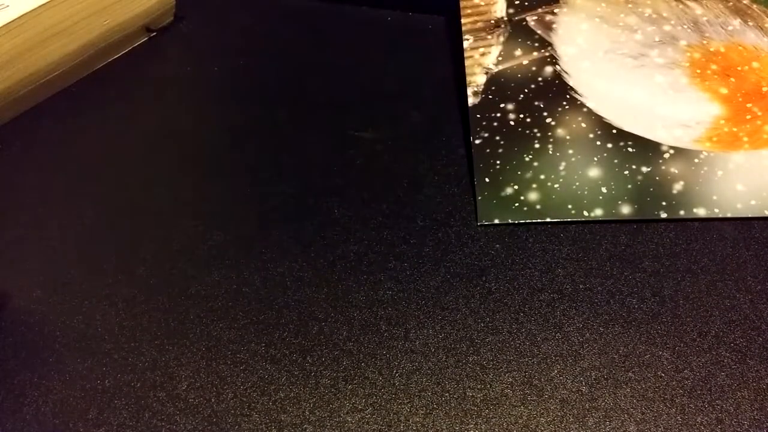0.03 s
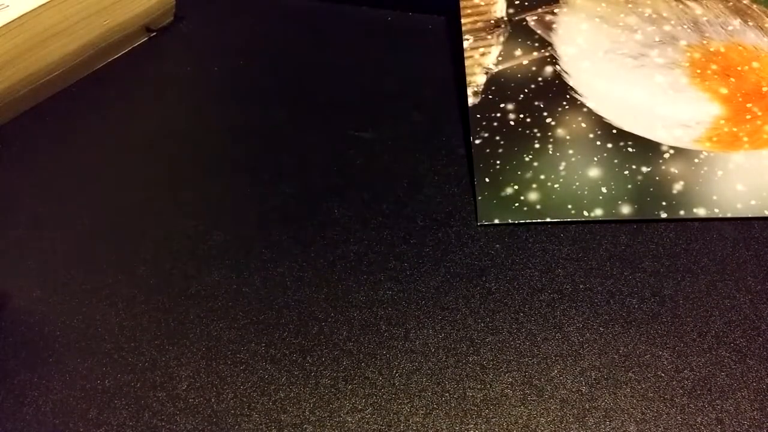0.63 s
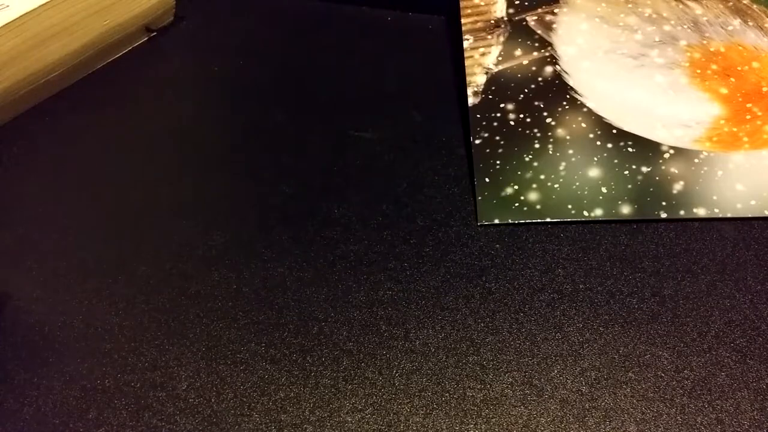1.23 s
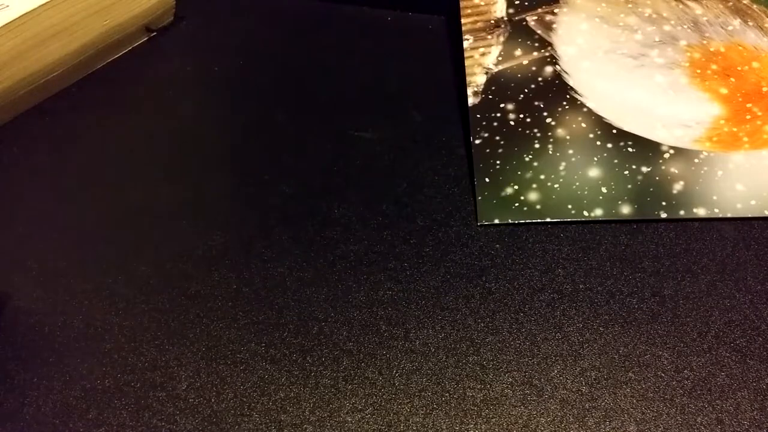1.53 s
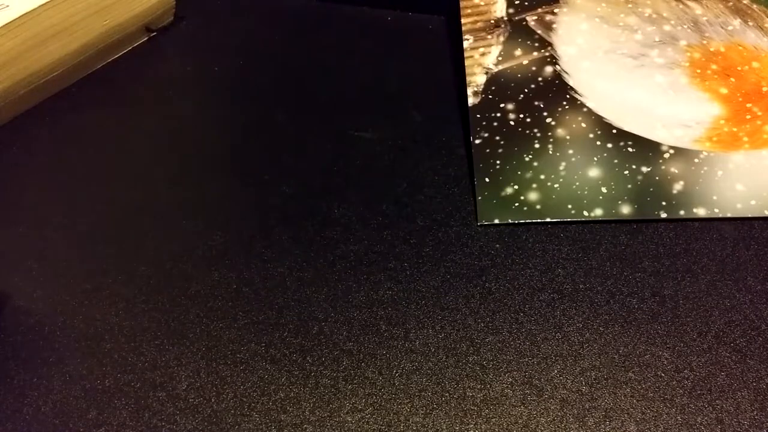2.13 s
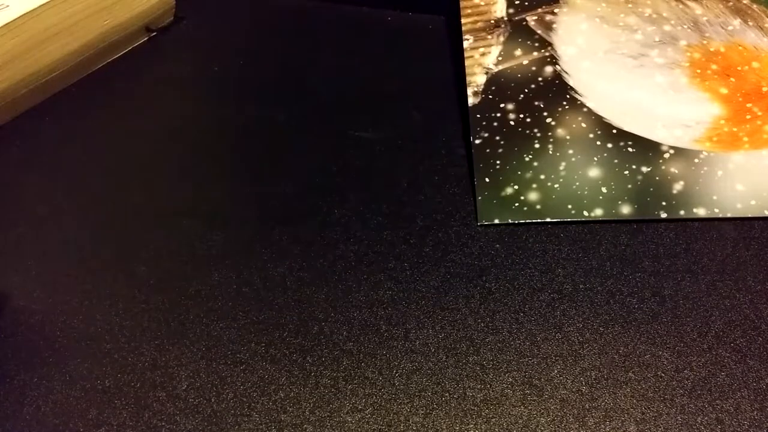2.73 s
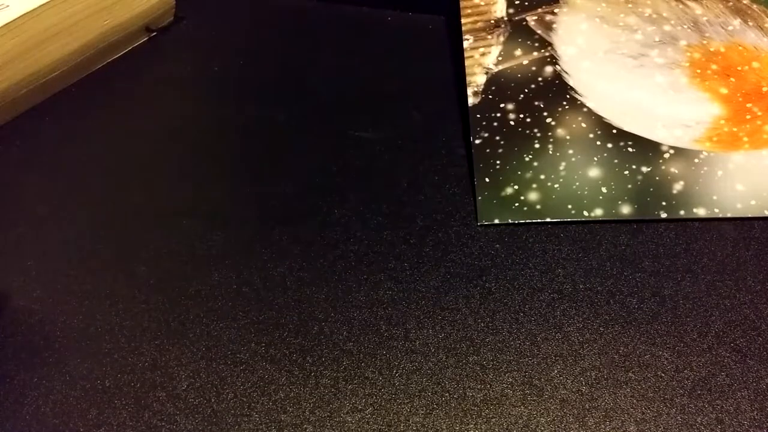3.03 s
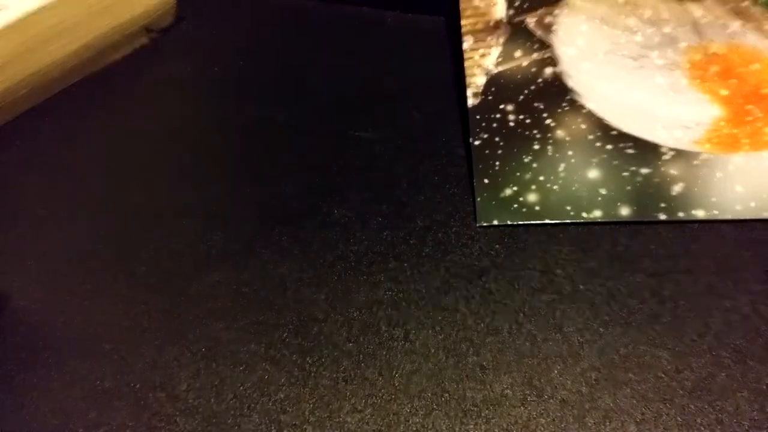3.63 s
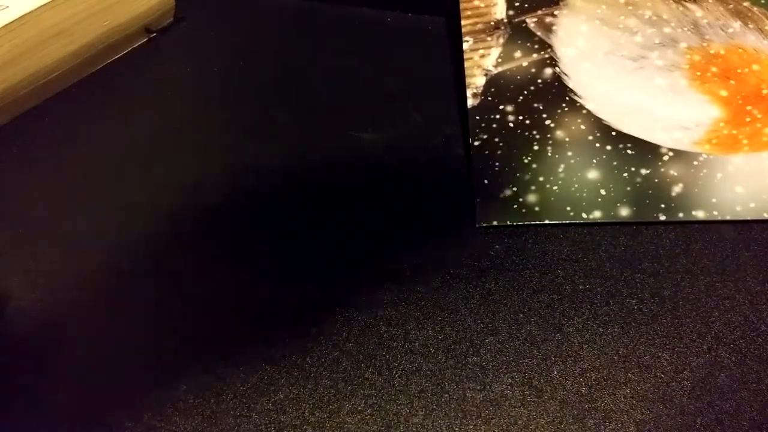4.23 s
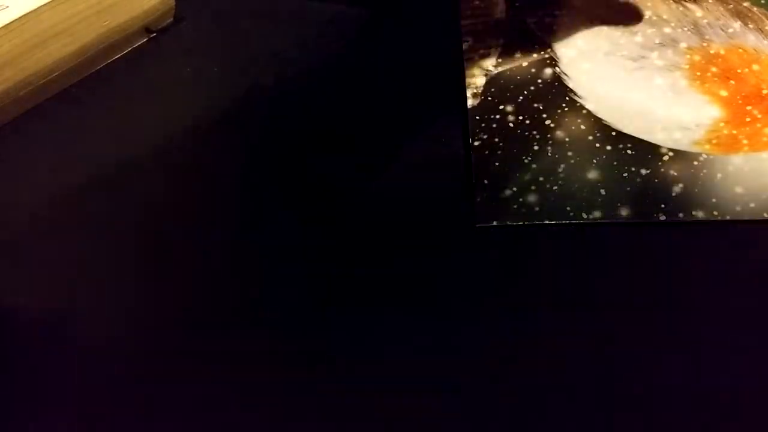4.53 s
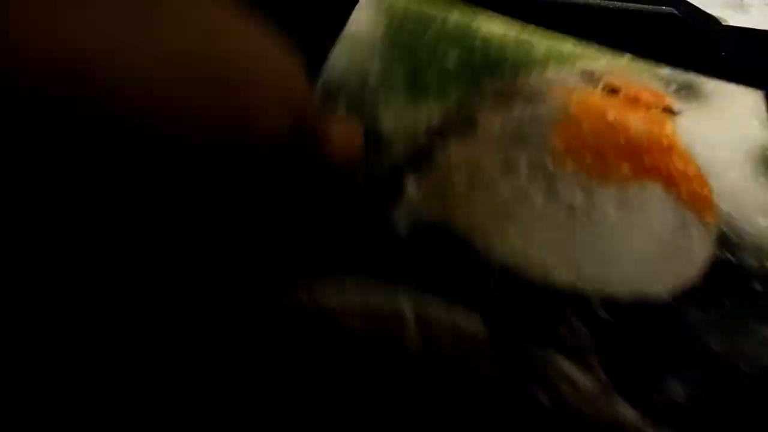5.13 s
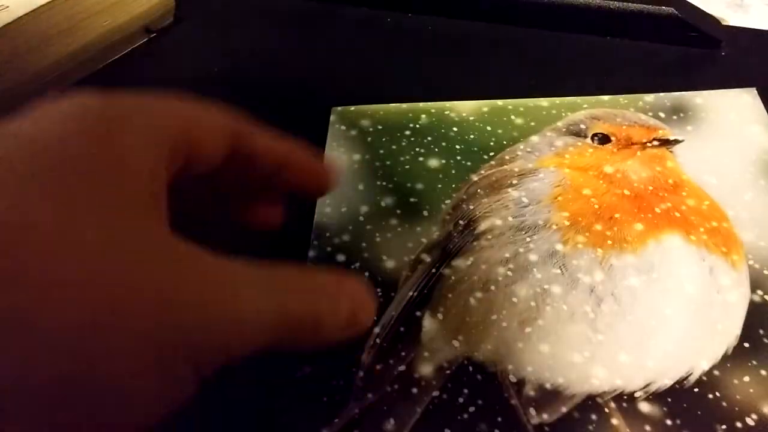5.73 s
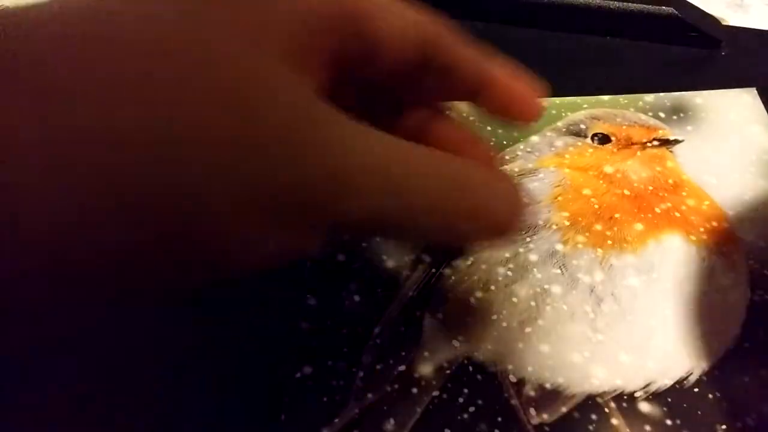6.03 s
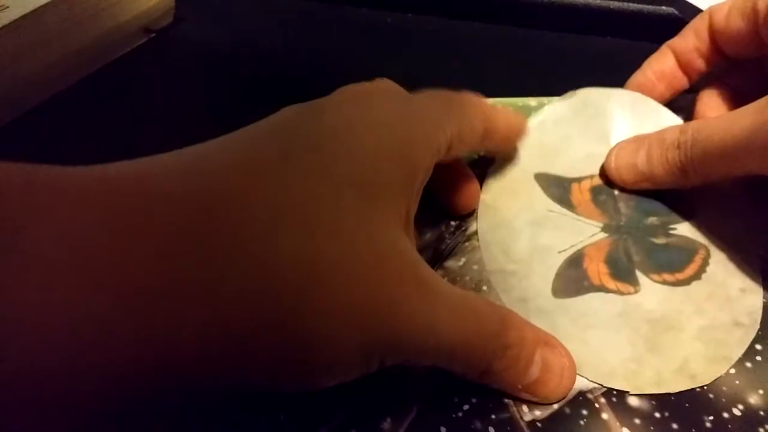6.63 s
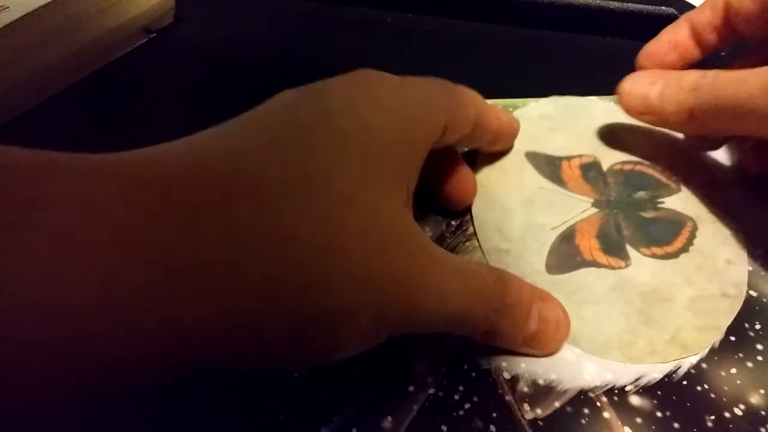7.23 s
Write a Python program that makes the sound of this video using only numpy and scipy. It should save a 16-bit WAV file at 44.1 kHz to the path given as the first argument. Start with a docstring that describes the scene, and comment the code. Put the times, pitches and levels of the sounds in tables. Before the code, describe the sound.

Light crinkling and swishing of adhesive film and card, interrupted by a hollow object set down, dragged and left rocking.

```python
"""Adhesive film at a craft table

A sheet of self-adhesive plastic film is handled close up in a small room. The backing slides in tiny
slips, creases buckle and snap, and stick-slip draws short squeaks. Something hollow is set down, dragged
and left rocking, its body ringing with the table top. Then a card is pulled over and the film is laid
on it. A mains hum and a soft hiss lie underneath."""
import sys
import numpy as np
from scipy import signal
from scipy.fft import rfft, irfft, next_fast_len
from scipy.io import wavfile
from scipy.ndimage import uniform_filter1d

SR = 44100
rng = np.random.default_rng(int(sys.argv[2]) if len(sys.argv) > 2 else 0)


def store_wav(level_fs):
    """Save 16-bit WAV to argv[1]."""
    pcm = np.round(np.clip(np.atleast_2d(level_fs), -1, 1) * 32767)
    wavfile.write(sys.argv[1], SR, pcm.T.astype(np.int16))


N = 320518
TIME = np.arange(N) / SR
STEPS = np.arange(0, N / SR + .001, .001)  # millisecond grid for hand movements, t/s

# a hand slides film or card along: start/s, length/s, rustle/dB, hiss/dB
STROKES = [(0.082, 0.15, -61, -65.5), (0.198, 0.14, -60.5, -64), (0.275, 0.1, -48, -53.5),
           (0.397, 0.13, -63, -78), (0.649, 0.09, -67, -62.5), (.73, 0.18, -77, -70.5),
           (1.277, 0.07, -60.5, -63), (1.354, 0.12, -45.5, -49.5), (1.552, 0.14, -72, -63.5),
           (1.72, 0.22, -61, -61), (1.793, 0.088, -50, -51.5), (1.864, .12, -53, -55),
           (1.958, 0.14, -60, -60), (2.042, 0.39, -65.5, -66), (2.303, 0.2, -64.5, -54.5),
           (2.475, 0.23, -68, -61.5), (2.695, 0.098, -68, -60), (2.802, 0.34, -66, -54.5),
           (3.066, 0.15, -66, -62), (3.19, 0.25, -60.5, -56.5), (3.416, 0.13, -59, -62),
           (3.543, 0.14, -63, -55.5), (3.726, 0.037, -46, -63), (3.797, 0.12, -60, -50),
           (3.886, 0.065, -51, -48), (4.022, 0.14, -66, -61), (4.28, 0.21, -85, -72.5),
           (4.759, .13, -46.5, -57.5), (4.868, 0.088, -44.5, -63), (4.841, 0.23, -52.5, -57.5),
           (4.986, 0.33, -67.5, -73.5), (5.305, 0.2, -64, -59), (5.439, 0.08, -48, -46.5),
           (5.864, 0.3, -85, -66), (6.142, 0.43, -69.5, -72.5), (6.47, 0.21, -74, -67.5),
           (6.616, 0.031, -75, -59), (6.697, 0.15, -79, -78), (6.96, 0.054, -66, -63.5)]
# the film lets go all at once and skids to rest: t/s, rustle/dB, hiss/dB
SKIDS = [(0.043, -52.5, -58), (.214, -55, -60), (0.414, -74, -54.5), (.52, -55, -51), (1.335, -50.5, -43),
         (1.69, -54, -52), (2.036, -70, -52.5), (3.205, -47, -49), (4.28, -92, -69), (4.667, -47, -59.5),
         (5.295, -60, -54.5), (5.73, -64, -56), (5.844, -67, -58.5)]
# bending modes of card and film: f/Hz, width/Hz, relative level/dB
SHEET_MODES = [(820, 108, 0), (1153, 31, 0.5), (2005, 380, 9.5), (2370, 35, -6.5), (3180, 360, -7),
               (4580, 940, 2)]
# creases snap and edges tick:
# t/s, level/dB, decay/ms, ring f/Hz, ring share (0-1), relative treble/dB, relative thud/dB
SNAPS = [(0.0465, -39.5, 2.5, 5070, 0.5, -1, -11.5), (0.0711, -47.5, 6.1, 2800, 1, -15, -17),
         (0.1141, -42, 2.2, 2150, 0.02, -8, -30), (0.2157, -34, 1.52, 5940.0, 0.1, -3, -16),
         (0.244, -46, 1.3, 3030, 0, 3, -12), (0.3108, -33, 1.54, 2020, 0.5, -2.5, -24),
         (0.3208, -37.5, 4.3, 2170, 0.6, -18, -30), (0.3386, -39.5, 5.9, 1970, 0.3, -22, -15),
         (0.5221, -40.5, 7.5, 3530, 0.01, -1.5, -7.5), (1.084, -42.5, 2.7, 3100, 0.47, -11, -29),
         (1.0908, -46, 2.2, 3120, 0.5, 5.5, -25), (1.1451, -44, 3.3, 3120, 0.2, -3.5, -7),
         (1.2789, -41, 2.3, 1590, 1, 0, -15), (1.3463, -37, 2.5, 4700, 0.6, -1.5, -28.0),
         (1.4296, -37, 5.3, 2320, 0.7, 1.5, -36), (1.4361, -33.5, 6, 2220, 0.13, -13, -8.5),
         (1.6944, -36.5, 8.5, 1190, 0.66, -8, -5.5), (1.9606, -52, 6.7, 1930, 0.6, -17, -9.5),
         (2.0388, -30.5, 3.24, 1740, 0.8, -4, -35), (2.293, -53, 3, 1590, 0.92, -1, -26),
         (2.886, -51.5, 3.7, 1000, 1, -5, -3), (2.9325, -45.5, 5.2, 3570, 0.34, -13, 5),
         (2.9588, -42, 9.3, 2060, 0.04, -3.5, -6), (3.047, -50, 4.1, 4120, 0.7, 5, -17),
         (3.2081, -39.5, 6.1, 2500, 0.7, -9, -10), (3.4719, -46.5, 4.8, 3160, 0.5, -0.5, -20.0),
         (3.68, -34.5, 3, 2280, 0.14, -20, -20), (3.7205, -25.5, 1.4, 11300, 0.23, -29, 0),
         (3.7444, -33, 3.5, 12400, 0.8, -17, -20.0), (3.9237, -41, 4, 4400, 0.5, -12, -17),
         (3.9315, -37.5, 4, 4560, 0.26, -19, -8.5), (4.1103, -55.5, 7.6, 1840, 0.3, -19, -3),
         (4.2748, -58, 4.1, 1100, 0.79, -15, -10.0), (4.6162, -53.5, 2.0, 1560, 0.2, -21, -1),
         (4.632, -52.5, 2.6, 1590, 0.7, -26, 0), (4.6666, -53, 8.4, 2060.0, 0, -3, -1),
         (4.6806, -44, 3.9, 1410, 0.7, -16, -1.5), (4.8839, -38.5, 2.4, 1360.0, 0.03, -24, -3.5),
         (4.9026, -40.5, 9.5, 4570, 0.1, -30, -16), (5.1696, -43.5, 3, 1320, 0, -21, -6.5),
         (5.3623, -38.5, 2.56, 2720, 0.33, -13, -11), (5.4674, -36.5, 5.6, 5230, 1, -3, -17),
         (5.4805, -36.5, 9.6, 3640, 0.17, -20, -23), (5.5047, -30, 2.4, 700, 1, -18, -11.5),
         (5.7325, -55.5, 4.4, 2200, 0.5, 3.5, -6), (6.175, -41, 3.6, 1580, 0.05, -15, -10.5),
         (6.233, -47.5, 3.7, 1340, 0, -17, -10), (6.283, -41.5, 0.87, 3250, 0.01, -11, -7),
         (6.3723, -43, 7.3, 3730, 0.02, -4.5, -20), (6.48, -51, 4.5, 930, 0.6, -8, -22.0),
         (6.7084, -41, 1.6, 1056, 0.85, -9.5, -29), (6.9936, -52.5, 6.1, 4070, 0.5, -3.5, -16)]
# film and card squeak: peak t/s, level/dB, half-length/s, f/Hz, glide/(octaves per s)
SQUEAKS = [(1.295, -57, 0.014, 1620, 0), (1.457, -45, 0.0059, 2750, 7.5), (1.836, -52.5, 0.016, 2640, -0.5),
           (1.934, -52, 0.011, 2700, -4), (1.96, -51.5, 0.0094, 2020, -4), (2.04, -35, 0.0038, 1718, 1.5),
           (2.899, -59, 0.014, 986, 0.5), (4.107, -63, 0.008, 2710, -6), (4.275, -63, 0.0033, 2780, -1.5),
           (4.813, -52, .025, 2230, -2), (4.91, -59, .02, 1293, -0.5), (6.713, -61, 0.0025, 3070, 6)]
# object and table top ring together: f/Hz, relative level/dB, t60/s
BODY_MODES = [(136, -13, 0.046), (189, -8, 0.093), (235, 2, 0.073), (334, -2, 0.1), (368.7, -5.5, 0.11),
              (473, -17, 0.095), (509.3, -1.5, 0.18), (561, -7.5, 0.15), (628, -6.5, 0.055),
              (782, 3.5, 0.023), (974, -1.5, 0.096), (1230, -10, 0.083), (1400, 2, 0.018),
              (1616, -3, 0.074), (1854, -0.5, 0.04), (2270, -4.5, 0.027)]
# the object meets the table: t/s, level/dB, contact f/Hz, relative boom/dB, relative clack/dB
KNOCKS = [(2.928, -56, 426, -23, 0), (2.9581, -45.5, 300, 6.5, -3), (3.204, -18, 388, -5, -9),
          (3.2526, -36, 470, -28, -4), (3.284, -30, 420, -22, -14), (3.318, -30, 413, -0.5, -11.5),
          (3.4412, -33.5, 396, -2, -9.5), (3.5867, -26.5, 349, -2.5, -12), (3.6783, -29.5, 493, -3.5, -1.5),
          (3.7192, -21, 780, -16.5, -4.5), (3.7433, -29.5, 720, -22, -4), (3.8143, -40.5, 440, -4, -1),
          (3.8436, -40, 480, -7, -7)]
# the object is pulled over the table: start/s, length/s, level/dB
PULLS = [(3.205, .11, -32), (3.29, 0.12, -45.5), (3.476, .13, -42), (3.549, 0.15, -38), (3.648, 0.094, -33),
         (3.812, 0.052, -40.5)]
# where the hands work: t/s, left minus right/dB, room send/dB
HAND_PLACES = [(0, 4.5, -1), (.35, 1.5, -5.5), (1.1, 5, -5.5), (1.7, 2, -11), (2.6, 0, -7.5),
               (2.93, -4, -17.5), (3.75, -5.5, -9), (4.3, -4, -7), (4.9, -3.5, -5.5), (5.4, -6.5, -13.5),
               (6.4, -4, -13.5), (6.68, 0, -11), (7.27, 3.5, -11)]
# decay of the room: f/Hz, t60/s
ROOM_DECAY = [(150, 0.54), (500, 0.19), (1500, 0.21), (5000, 0.21), (15000, 0.16)]

# tone colours, each one: f/Hz, relative level/dB
AIR_EQ = [(20, -9), (50, -11.5), (80, 0.5), (150, -0.5), (240, 5), (400, 0.5), (650, -3.5), (1500, -7.5),
          (3100, -11), (5000, -13.5), (7700, -19), (11400, -22), (16000, -26)]  # room air
RUSTLE_EQ = [(60, -44), (200, -1.5), (400, -0.5), (750, 2.5), (1200, 4.5), (2000, -7), (3000, 2.5),
             (4700, -9), (7000, -3.5), (12000, -47)]  # midrange of the sliding sheet
HISS_EQ = [(1200, -31), (2500, 3), (4500, 4.5), (6000, 3.5), (7500, -2.5), (9500, 1.5), (11500, 4),
           (14000, 0), (16000, -4.5)]  # top end of the sliding sheet
CRACK_EQ = [(300, -23), (600, 0), (1000, 8.5), (2000, 4), (3200, 2.5), (5000, 0), (6500, -0.5), (9000, -20)]  # bite of a snap
TREBLE_EQ = [(3500, -33), (5500, 0.5), (7500, 0.5), (9000, 7), (11500, 6), (14000, 1.5), (16000, -6.5)]  # bright tip of a snap
THUD_EQ = [(40, -17.5), (90, -10), (220, -3.5), (400, -1), (650, -7), (1200, -34)]  # weight under snaps and drags
CLACK_EQ = [(500, -19), (900, 8.5), (1400, 6.5), (2300, 2.5), (3200, -3), (4600, -10), (7000, -24.5),
            (12000, -18)]  # a hard edge on the table

TOP_HZ = 16200  # treble cutoff


def undb(db):
    """Decibels to gain."""
    return 10 ** (np.asarray(db) / 20)


def unit(x):
    """Scale to rms 1."""
    return x / np.sqrt(np.mean(x ** 2) + 1e-30)


def colour(x, eq):
    """Causal EQ through (f/Hz, level/dB) points, falling 24 dB an octave below the first."""
    n = x.shape[-1]
    size = 2 * next_fast_len(n)
    hz, db = np.transpose(eq)
    f = np.maximum(np.arange(size // 2 + 1) * SR / size, 1)
    skirt_db = -24 * np.maximum(np.log2(hz[0] / f), 0)
    gain = undb(np.interp(np.log(f), np.log(hz), db) + skirt_db)
    cepstrum = irfft(np.log(gain))
    cepstrum[1:size // 2] *= 2  # fold to minimum phase
    cepstrum[size // 2 + 1:] = 0
    return irfft(rfft(x, size) * np.exp(rfft(cepstrum)))[..., :n]


def resonance(x, hz, width_hz, passes=1):
    """Two-pole band-pass with gain 1 at the centre; more passes steepen it."""
    for _ in range(passes):
        x = signal.lfilter(*signal.iirpeak(hz, hz / min(width_hz, SR / 3), SR), x)
    return x


def stereo_noise(n, apart):
    """White noise, from mono (apart=0) to fully wide (apart=1)."""
    noise = rng.standard_normal((3, n))
    return np.sqrt(1 - apart) * noise[0] + np.sqrt(apart) * noise[1:]


def wander(rate_hz):
    """Smooth random drift, heading for a new value rate_hz times a second."""
    hold = int(SR / rate_hz)
    stairs = np.repeat(rng.standard_normal(N // hold + 1), hold)
    return 1.97 * uniform_filter1d(stairs, hold)[:N]


def add(track, s, x):
    """Mix a sound in at time s."""
    i = max(int(s * SR), 0)
    track[:, i:i + x.shape[-1]] += x[..., :N - i]


def air_and_hum(air_db=-67, hum_hz=99.7, hum_db=-68.5):
    """The bed: room air and a wavering transformer hum, a little to the right."""
    air = unit(colour(stereo_noise(N, 0.58), AIR_EQ)) * undb(air_db + .5 * wander(3.33))
    hum = np.sqrt(2) * np.sin(2 * np.pi * hum_hz * TIME) * undb(hum_db + wander(0.99))
    return air + hum * undb([[-1], [1]])


def stroke(start_s, length_s, half_width=0.4, flatness=2.33):
    """Friction envelope of one hand movement: the speed swells and falls in a flat-topped bell."""
    from_middle = np.abs((STEPS - start_s) / length_s - .5)
    return np.exp(-np.minimum(from_middle / half_width, 5) ** flatness)


def skid(start_s, attack_s=0.0075, release_s=0.039):
    """Friction envelope of a sudden release: a quick attack, then a steady loss of speed."""
    t = np.maximum(STEPS - start_s, 0)
    return np.minimum(t / attack_s, 1) * np.exp(-np.maximum(t - attack_s, 0) / release_s)


def rubbing_db(resting_rustle_db=-72.5, resting_hiss_db=-90):
    """Rustle and hiss levels: strokes and skids add in power, and the held sheet is never quite still."""
    moves = [(stroke(s, length_s), levels) for s, length_s, *levels in STROKES]
    moves += [(skid(s), levels) for s, *levels in SKIDS]
    resting = undb([[resting_rustle_db], [resting_hiss_db]]) ** 2
    moving = sum(np.outer(undb(levels) ** 2, env ** 2) for env, levels in moves)
    return [np.interp(TIME, STEPS, 10 * np.log10(power)) for power in resting + moving]


def sliding(slips_per_s=1500, slip_s=0.00075, smoothness=0.96, flex=3.5, flicker=1.21):
    """Surfaces catch and let go in countless tiny slips; the sheet's modes come and go as it flexes."""
    rustle_db, hiss_db = rubbing_db()
    slip_sizes = undb(3 * np.minimum(rng.exponential(size=N), 5))
    slip_power = (rng.random(N) < slips_per_s / SR) * slip_sizes ** 2
    grit = unit(np.sqrt(signal.lfilter([1], [1, -np.exp(-1 / (slip_s * SR))], slip_power)))
    friction = stereo_noise(N, 0.98) * np.hypot(smoothness, grit)
    flexing = sum(resonance(friction, hz, width_hz) * undb(db + 1 + flex * wander(12))
                  for hz, width_hz, db in SHEET_MODES)
    rustle = unit(colour(friction + flexing, RUSTLE_EQ)) * undb(rustle_db + flicker * wander(70))
    hiss = unit(colour(friction[::, ::-1], HISS_EQ)) * undb(hiss_db + flicker * wander(50))
    return rustle + hiss


def snaps(ring_width_hz=260, octave_db=-10, broadband_db=-13, size=4096):
    """A crease buckles: a tight burst of cracks, the ring of the facet beside it, a thud in the sheet."""
    out, lead = np.zeros((2, N)), size // 4
    t_ms = (np.arange(size) - lead) / SR * 1000
    for s, db, decay_ms, ring_hz, ring_share, treble_db, thud_db in SNAPS:
        rise_ms = decay_ms ** 2 / 12  # long snaps are avalanches that build up first
        env = np.exp(-np.abs(t_ms) / np.where(t_ms < 0, rise_ms, decay_ms))
        burst = env * stereo_noise(size, 0.42)
        ring = unit(resonance(burst, ring_hz, ring_width_hz))
        if 2 * ring_hz < TOP_HZ:
            ring += undb(octave_db) * unit(resonance(burst, 2 * ring_hz, ring_width_hz))
        # a large, low-pitched facet cracks duller than a small one
        facet = resonance(burst, ring_hz, 3.1 * ring_hz, passes=2)
        crack = unit(colour(facet + undb(broadband_db) * burst, CRACK_EQ))
        snap = np.sqrt(ring_share) * ring + np.sqrt(1 - ring_share) * crack
        snap += undb(treble_db) * unit(colour(burst, TREBLE_EQ))
        snap += undb(thud_db) * unit(colour(burst, THUD_EQ))
        add(out, s - lead / SR, undb(db) * np.sqrt(np.mean(env ** 2)) * snap)
    return out


def squeaks(width_hz=130, octave_db=-16, size=8192):
    """Quick stick-slip makes one mode of the film sing; its pitch slides as the free length changes."""
    out = np.zeros((2, N))
    t = (np.arange(size) - size // 2) / SR
    for s, db, half_length_s, hz, glide in SQUEAKS:
        phase = 2 * np.pi * np.cumsum(hz * 2 ** (glide * t)) / SR
        grip = signal.lfilter(*signal.butter(2, width_hz / 2, fs=SR), rng.standard_normal((2, size)))
        fundamental, octave = (grip[0] * np.cos(k * phase) + grip[1] * np.sin(k * phase) for k in (1, 2))
        tone = fundamental + undb(octave_db) * octave
        env = np.exp(-(t / half_length_s) ** 2 / 2)
        add(out, s + t[0], undb(db) * unit(tone * env) * np.sqrt(np.mean(env ** 2)))
    return out


def hollow_body(scatter_db, echo_s=.0089, echo_gain=0.22, size=8192):
    """One push rings the object's modes, weighted at random as if touched in a new spot."""
    t = np.arange(size) / SR
    ring = 0
    for hz, db, t60 in BODY_MODES:
        gain = rng.choice([-1, 1]) * undb(db + scatter_db * rng.standard_normal((2, 1)))
        ring = ring + gain * np.sin(2 * np.pi * hz * t) * 1000 ** (-t / t60)
    echo = np.pad(ring, ((0, 0), (int(echo_s * SR), 0)))[:, :size]  # off a hard surface by the table
    return ring + echo_gain * echo


def knocks(blows, sustain, damping_s=0.015, clack_s=0.012, rattle_db=-5, boom_top_hz=300):
    """Blows on the table ring, boom and clack; a low sustain is the hand damping the ring at once."""
    out, attack = np.zeros((2, N)), int(0.0077 * SR)
    boom_band = signal.butter(2, [boom_top_hz / 2.77, boom_top_hz], "bandpass", fs=SR, output="sos")
    for s, db, contact_hz, boom_db, clack_db in blows:
        ring = hollow_body(scatter_db=1.5)
        t = np.arange(ring.shape[1]) / SR
        ring *= sustain + np.exp(-(t / damping_s) ** 2 / 2)
        # a short, stiff contact favours the higher modes
        tone = resonance(ring, contact_hz, 0.97 * contact_hz, passes=2)
        boom = signal.sosfilt(boom_band, ring)
        burst = stereo_noise(len(t), 1.0) * np.exp(-t / clack_s)
        clack = unit(colour(burst, CLACK_EQ)) + undb(rattle_db) * unit(colour(ring, CLACK_EQ))
        layers = [(tone, db), (boom, db + boom_db), (clack, db + clack_db)]
        add(out, s, sum(x * undb(layer_db) / np.std(x[:, :attack]) for x, layer_db in layers))
    return out


def dragging(slips_per_s=450, soft_hz=950, damping_s=0.017, gentle_hz=380, rumble_db=-8):
    """Uneven stick-slip pushes ring the body, damped by the hand, over a low rumble."""
    pull_power = sum((undb(db) * stroke(s, length_s)) ** 2 for s, length_s, db in PULLS)
    pull = np.interp(TIME, STEPS, np.sqrt(pull_power))
    judder = 0
    for _ in range(3):  # each corner catches and rings the modes in its own way
        slips = rng.random(N) < slips_per_s / SR
        force = undb(3 * rng.standard_normal(N) + 3 * wander(25.11)) * rng.choice([-1, 1], N)
        pushes = signal.lfilter(*signal.butter(2, soft_hz, fs=SR), slips * force)
        ring = hollow_body(scatter_db=4.0)
        ring *= np.exp(-np.arange(ring.shape[1]) / SR / damping_s)
        judder = judder + signal.fftconvolve(pushes[None], ring, axes=1)[:, :N]
    judder = unit(signal.sosfilt(signal.butter(2, 170, "highpass", fs=SR, output="sos"), judder))
    # a gentle pull stirs only the low modes; the rest grow with its force
    low = signal.sosfiltfilt(signal.butter(2, gentle_hz, fs=SR, output="sos"), judder)
    brightness = (pull / pull.max()) ** 0.44
    rumble = undb(rumble_db) * unit(colour(stereo_noise(N, 0.42), THUD_EQ))
    return (low + (judder - low) * brightness + rumble) * pull


def rocking(period_s=0.1511, first_db=-41, loss_db=1.5, contact_hz=700, boom_db=-15, clack_db=-14.5):
    """Let go after the last knock, the object rocks: three even taps, each weaker, ringing freely."""
    let_go_s = KNOCKS[-1][0]
    taps = [(let_go_s + (k + 1) * period_s, first_db - k * loss_db, contact_hz, boom_db, clack_db)
            for k in range(3)]
    return knocks(taps, sustain=1)


def room(x, predelay_s=0.0022, build_s=0.0032, early_boost=1.65, early_s=0.028, size=24000):
    """A small furnished room: quick reflections off the table and shelves, then a diffuse tail."""
    t = np.arange(size) / SR
    f, frame_s, spectrum = signal.stft(stereo_noise(size, .85), SR, nperseg=256)
    hz, t60 = np.transpose(ROOM_DECAY)
    decay = 1000 ** (-frame_s / np.interp(np.log(f + 1), np.log(hz), t60)[:, None])
    shape = np.clip((t - predelay_s) / build_s, 0, 1) * (1 + early_boost * np.exp(-t / early_s))
    tail = signal.istft(spectrum * decay, SR)[1][:, :size] * shape
    return signal.fftconvolve(x, unit(tail) / np.sqrt(size), axes=1)[:, :N]


def pan(x, pan_db, lag_s_per_db=.000066):
    """Constant-power pan: the sound arrives louder and sooner on the nearer side."""
    side_db = np.array([[1], [-1]]) * pan_db / 2
    lead = np.round(side_db * lag_s_per_db * SR).astype(int)
    shifted = np.take_along_axis(x, np.clip(np.arange(N) + lead, 0, N - 1), axis=1)
    gain = undb(side_db)
    return shifted * gain / np.sqrt(np.mean(gain ** 2, axis=0))


def scene():
    """All the handling, panned with the hands and sent to the room, over the bed of air and hum."""
    s, *columns = np.transpose(HAND_PLACES)
    pan_db, send_db = (np.interp(TIME, s, column) for column in columns)
    film = snaps() + squeaks() + sliding()
    hollow_object = knocks(KNOCKS, sustain=0.19) + rocking() + dragging()
    handling = film + hollow_object
    return pan(handling, pan_db) + room(handling * undb(send_db)) + air_and_hum()


def record(dry):
    """A steep low-pass shaves off the very top."""
    return signal.sosfilt(signal.ellip(8, .2, 70, TOP_HZ, fs=SR, output="sos"), dry)


dry = scene()
out = record(dry)
store_wav(out)
```